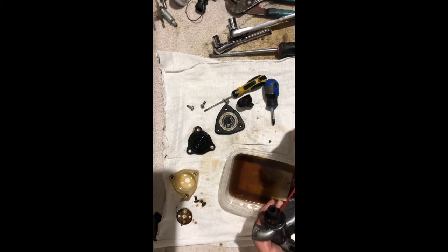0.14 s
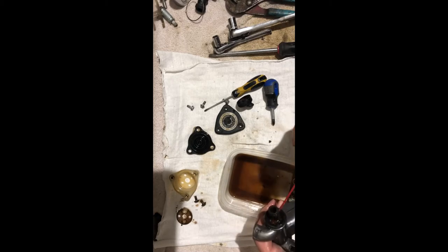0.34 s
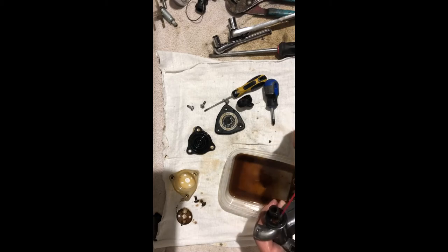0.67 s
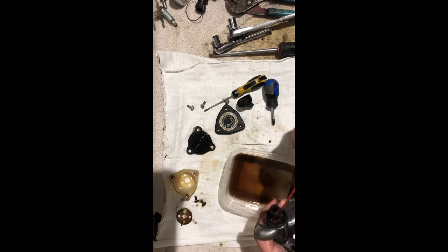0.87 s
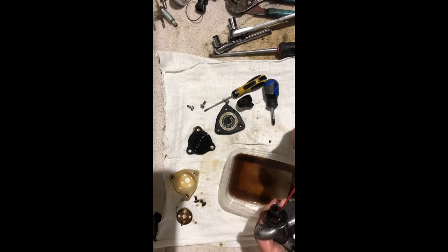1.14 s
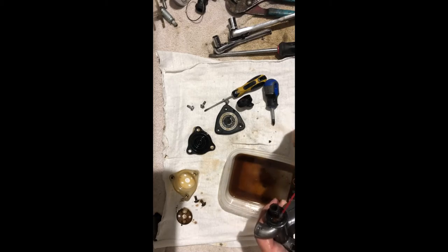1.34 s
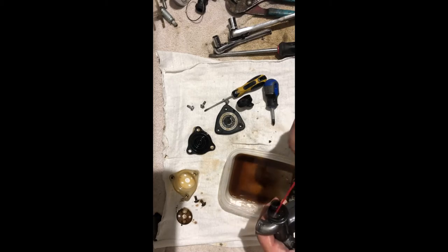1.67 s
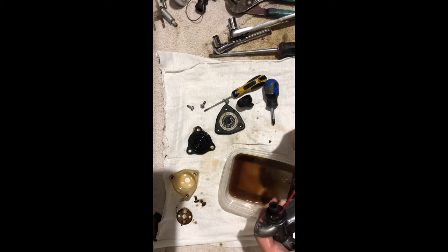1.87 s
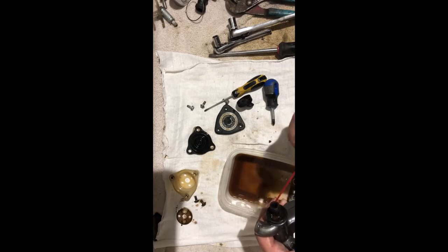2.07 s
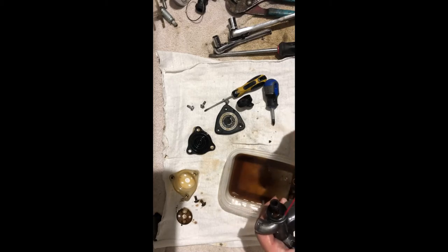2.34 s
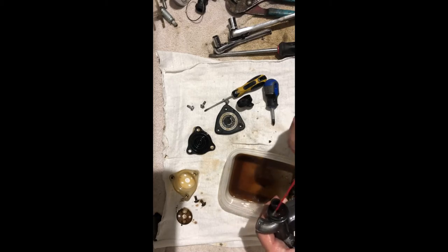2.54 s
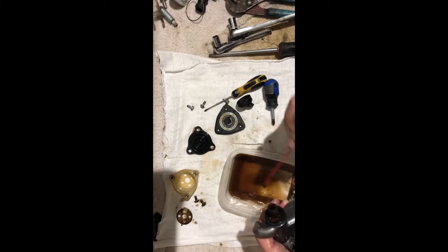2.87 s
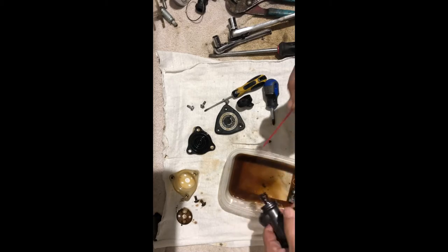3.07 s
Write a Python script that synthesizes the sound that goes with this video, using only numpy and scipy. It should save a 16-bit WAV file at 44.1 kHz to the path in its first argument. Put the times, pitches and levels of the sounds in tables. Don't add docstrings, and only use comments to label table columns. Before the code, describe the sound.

An aerosol can hisses harshly and spits through a straw into a metal part, very close, its tone shifting with aim; it cuts off with a short squeal and faint ticks in a quietly humming garage.

```python
import sys
import numpy as np
from scipy import signal
from scipy.fft import rfft, irfft
from scipy.io import wavfile
from scipy.ndimage import uniform_filter1d

SR = 44100
rng = np.random.default_rng(int(sys.argv[2]) if len(sys.argv) > 2 else 0)


def bounce(signal):
    frames = np.transpose(np.atleast_2d(signal))
    limited = np.clip(frames, -1, 1)
    pcm = np.round(limited * 32767).astype(np.int16)
    wavfile.write(sys.argv[1], SR, pcm)


def linear_from_db(decibels):
    return 10 ** (np.asarray(decibels, float) / 20)


N = 141120
T = np.arange(N) / SR

# time in seconds, flow in dB, aim (0 into the bore, 1 against the wall),
# fizz in dB, tuning of the bore as a factor.
HAND = [(.174, -66.5, .3, 6, 0.98), (.197, -47, 0.026, -9, 0.97), (.31, -40.5, 0.18, -1, 1.01),
        (.73, -43, 0.021, -3.5, 0.99), (.84, -42, 0.059, -1, 1.04), (.91, -40.5, 0.13, 5, 1.008),
        (1.02, -42, 0.12, 1.5, 0.99), (1.2, -39, 0.039, 2.5, 1.0), (1.37, -41, 0.15, 2, 1.01),
        (1.49, -42.5, 0.32, -0.5, 0.96), (1.7, -43.5, 0.86, 6, 1), (1.85, -43, 0.56, 1.5, 0.97),
        (1.95, -41, 0.23, 2.5, 1.062), (2.08, -42, 0.026, -1, 1), (2.17, -42.5, 0.26, -3, 1.05),
        (2.3, -41.5, 0.22, -0.5, 1.01), (2.45, -44.5, 0.72, 2, 0.97), (2.65, -42.5, 0.65, 5, 0.99),
        (2.8, -41.5, 0.09, -3, 1.05)]
# time in seconds, flow in dB, share of bare gas (0-1).
CLOSING = [
    (2.835, -1, 0.037),
    (2.852, -6, 0.85),
    (2.864, -8.5, 1),
    (2.89, -8, 1),
    (2.928, -14, 1),
    (2.945, -27.5, 1),
    (3.025, -34, 0.75),
    (3.045, -29, 1),
    (3.11, -40, 0.87),
]
SPIT_S = 0.00076
ROOM_DB = -12.5


def evened(x):
    return x / np.sqrt(np.mean(x ** 2) + 1e-20)


def read(points, hz):
    f, value = np.transpose(points)
    return np.interp(np.log(hz + 1), np.log(f + 1), value)


def curves(rows, t):
    s, *columns = np.transpose(rows)
    return [np.interp(t, s, column) for column in columns]


def wander(size):
    smooth = uniform_filter1d(rng.standard_normal(N), size)
    return evened(uniform_filter1d(smooth, size))


def resonate(x, hz, width):
    turn = np.exp(2j * np.pi * hz * T)
    r = np.exp(-np.pi * width / SR)
    return 2 * (turn * signal.lfilter([1 - r], [1, -r], x / turn)).real


def narrow_noise(air, hz, width):
    return evened(resonate(resonate(air, hz, width), hz, width))


def bump(hz, centre_hz, width):
    return 1 / (1 + (2 * (hz - centre_hz) / width) ** 2)


def whistle(modes, swell):
    air = rng.standard_normal(N)
    tones = sum(linear_from_db(db) * narrow_noise(air, hz, width) for hz, width, db in modes)
    return evened(tones) * linear_from_db(curves(swell, T)[0]) * (T > swell[0][0])


def room(x):
    t = T[:SR // 2]
    air = rng.standard_normal(len(t))
    low = signal.sosfilt(signal.butter(4, 6640, fs=SR, output="sos"), air)
    low_t60, top_t60 = 0.25, 0.16
    tail = low * linear_from_db(-60 * t / low_t60) + (air - low) * linear_from_db(-60 * t / top_t60)
    tail = tail * (t > .004)
    return signal.fftconvolve(x, tail / np.linalg.norm(tail))[:N]


def garage():
    # frequency in Hz, level in dB per Hz.
    air_colour = [(26, -41), (45, -6), (67, -1), (108, -22), (177, -6), (326, -18.5), (615, -18),
                  (1350, -25.5), (15500, -39.5)]
    # frequency in Hz, width in Hz, level in dB.
    machinery = [(58, 34, -4), (84.7, 14, -3.5), (140, 25, -6)]
    # time in seconds, level in dB.
    hum_swell = [(0.0, -70), (.15, -65), (.4, -63.5), (1.2, -65), (1.8, -68), (2.07, -65), (2.3, -68.5),
                 (2.8, -68), (3.2, -70)]
    air_db, low_cut_hz = -72, 52
    hz = np.fft.rfftfreq(N, 1 / SR)
    gain = linear_from_db(read(air_colour, hz)) / (1 + (low_cut_hz / (hz + 1)) ** 8)
    air = evened(irfft(rfft(rng.standard_normal(N)) * gain, N))
    hum = sum(linear_from_db(db) * evened(resonate(rng.standard_normal(N), f, width)) for f, width, db in machinery)
    return linear_from_db(air_db) * air + hum * linear_from_db(curves(hum_swell, T)[0])


def drained():
    # frequency in Hz, width in Hz, level in dB.
    ring = [(3030, 70, -3), (5050, 90, 0), (5430, 110, -3), (4860, 60, -6)]
    # time in seconds, level in dB.
    ring_swell = [(2.83, -80), (2.87, -60), (2.888, -58), (2.9, -53), (2.915, -60), (2.94, -64),
                  (2.97, -68), (2.985, -75), (3.01, -73), (3.06, -88)]
    return whistle(ring, ring_swell)


def straw():
    # frequency in Hz, width in Hz, level in dB.
    column = [(3020, 120, 0), (4500, 120, 0), (5850, 150, -3), (7000, 150, -3)]
    # time in seconds, level in dB.
    column_swell = [(2.7, -88), (2.8, -50), (2.835, -52), (2.855, -44), (2.875, -52), (2.94, -72.5),
                    (3.0, -81), (3.06, -91)]
    return whistle(column, column_swell)


def valve():
    # time in seconds, fundamental in Hz, level in dB,
    # level of the odd partials in dB, lost when the seat beats twice as fast.
    squeal = [
        (2.84, 890, -54, 0),
        (2.856, 905, -41, 0),
        (2.865, 985, -41, 0),
        (2.874, 1005, -39, 0),
        (2.883, 1018, -45, 0),
        (2.887, 985, -44, -25),
        (2.892, 915, -44, -30),
        (2.897, 825, -43, -30),
        (2.902, 745, -49, -30),
        (2.908, 680, -66, -30),
    ]
    # frequency in Hz, level in dB.
    squeal_tone = [(1650, -30), (2000, -14), (2680, -24), (3000, 1), (3300, -9), (3900, -14), (4800, -3),
                   (6100, -13), (8000, -28)]
    hz, db, odd_db = curves(squeal, T)
    turns = np.cumsum(hz * (1 + 0.0068 * wander(size=60))) / SR
    tone = 0
    for k in range(2, 10):
        partial_db = read(squeal_tone, k * hz) + k % 2 * odd_db
        tone = tone + linear_from_db(partial_db) * np.sin(2 * np.pi * k * turns)
    sounding = (T > squeal[0][0]) * (T < squeal[-1][0])
    return tone * linear_from_db(db + 1.5 * wander(size=80)) * sounding


def ticks():
    # time in seconds, level in dB, frequency in Hz, length in seconds, width as a share of frequency.
    puffs = [
        (.174, -63, 5200, .001, .8),
        (.1805, -63, 3200, .0015, .7),
        (2.984, -74, 13000, .003, .06),
        (3.045, -80, 8700, .012, .05),
        (3.055, -78, 14500, .028, .2),
        (3.18, -78, 4100, .03, .09),
    ]
    air = rng.standard_normal(N)
    out = np.zeros(N)
    for s, db, hz, length, share in puffs:
        out += narrow_noise(air, hz, share * hz) * linear_from_db(db) * np.exp(-((T - s) / length) ** 2)
    return out


def blobs():
    # time in seconds, level in dB.
    large_drops = [(0.2354, -30.5), (0.2575, -29), (0.9213, -24.5), (0.9661, -26), (1.2354, -27),
                   (1.2736, -31), (1.8882, -33), (2.0122, -32), (2.2452, -27), (2.7283, -36), (2.772, -27),
                   (2.8225, -40)]
    out = np.zeros(N)
    for s, db in large_drops:
        out += linear_from_db(db - 11.5) * np.exp(-np.maximum(T - s, 0) / SPIT_S) * (T > s - .0005)
    return out


def jet():
    flutter_db, surge_db = 0.5, 0.22
    spits_per_s, spit_spread_db, spit_db = 500, 2, -7.5
    unsteady_db = flutter_db * wander(size=24) + surge_db * wander(size=1200)
    hiss = rng.standard_normal(N) * linear_from_db(unsteady_db)
    sizes_db = spit_spread_db * np.minimum(rng.exponential(1, N), 2.5)
    drops = (rng.random(N) < spits_per_s / SR) * linear_from_db(sizes_db)
    bursts = signal.lfilter([1], [1, -np.exp(-1 / (SPIT_S * SR))], drops)
    spits = bursts * rng.standard_normal(N)
    return evened(hiss) + linear_from_db(spit_db) * evened(spits)


def colouring(hz, t):
    # frequency in Hz, level in dB per Hz.
    bore = [(150, -33), (250, -16), (669, -20), (867, -16), (1730, -12), (2800, -10.5), (6540, 0),
            (9390, -12.5), (15500, -18.5)]
    # frequency in Hz, level in dB per Hz.
    wall = [(150, -52), (250, -11), (553, -17.5), (1760, -12), (2620, -5.5), (4320, -4), (6000, -4.5),
            (7130, -12), (15500, -26)]
    # frequency in Hz, level in dB per Hz.
    bare_gas = [(300, -16.5), (2300, -12.5), (3000, -2), (4300, -1), (5200, 2.5), (7700, -10), (8800, -7),
                (10400, -24), (14500, -11)]
    # frequency in Hz, width in Hz, dB at the bore, dB at the wall.
    part = [(834, 146, 8, 11), (1110, 66, 2, 5.5), (1762, 35, 11, 10.5), (2420, 570, 3, -4.5),
            (6300, 170, 4.5, -5), (6870, 160, 5, 0), (7380, 570, 3, 8.5), (8070, 190, 5.5, -5.5),
            (8850, 390, 6, -6), (10120, 310, 6.5, -2), (11800, 180, 5, -1.5), (13800, 720, 5, -2.5),
            (15200, 540, 8.5, 4)]
    # frequency in Hz, width in Hz, dB at the bore, dB at the wall.
    bench = [(650, 150, -8, -8), (1300, 110, -7, -6), (1610, 60, -5, -4), (2800, 180, -9, -9),
             (5880, 250, -3, -12), (6250, 500, 0, -7), (7750, 250, -1, -9), (8310, 120, -8, -5),
             (9500, 200, -5, -3), (10400, 400, -4, -6), (11300, 120, -6, 0), (12050, 200, -3, -4),
             (14400, 300, -3, 0)]
    # frequency in Hz, width in Hz, dB at the bore, dB at the wall.
    cavity = [(3246, 580, 6, 7.5), (3920, 305, -8, -3.5), (4288, 265, 11, 6.5), (4710, 136, -11, -10),
              (5210, 140, 6, 5), (5550, 110, 4, 8.5)]
    # time in seconds, mist frequency in Hz, mist level in dB, rim level in dB.
    mist = [(.18, 14300, 6, 0), (.3, 13800, 5, 1), (.45, 14000, 2, 1), (.65, 15100, 6, 0),
            (.8, 13200, 2, -2), (.9, 13900, 5, 1), (1.02, 13500, 1, -2), (1.2, 13700, 4, 1),
            (1.33, 13500, 3, 0), (1.4, 13700, 5, 5), (1.47, 13400, 6, 1), (1.57, 13700, 11, 3),
            (1.7, 13900, 10, 5), (1.8, 13600, 10, 3), (1.93, 13800, 9, 4), (2.02, 12800, 2, 0),
            (2.06, 14900, 1, 1), (2.15, 14700, 8, 4), (2.25, 14300, 8, 6), (2.33, 13500, 8, 4),
            (2.39, 12200, 5, 8), (2.45, 11300, 3, 12), (2.49, 13600, 6, 8), (2.57, 13700, 10, 4),
            (2.62, 14200, 11, 6), (2.7, 14000, 10, 2), (2.77, 13500, 4, 3), (2.84, 14000, 0, 6)]
    # time in seconds, length in seconds, frequency
    # in Hz, width in Hz, change in dB.
    band_changes = [(.62, .15, 12000, 1500, -1), (0.92, .04, 13000, 700, -2), (1.5, .07, 11700, 890, -8),
                    (1.5, 0.17, 9800, 1000, -5), (1.65, 0.15, 7900, 1100, -3), (1.68, .13, 6200, 300, -5),
                    (2.0, .06, 13000, 970, -3), (2.16, .07, 11300, 1500, -3), (1.4, 0.063, 8400, 710, -11),
                    (2.2, .1, 4270, 220, -2), (2.2, 0.27, 8650, 1000, 4.5), (2.55, 0.13, 8300, 1200, -5),
                    (2.52, .1, 5600, 290, -6.5), (1.9, .06, 8800, 1000, -6), (2.875, 0.027, 1200, 800, -6),
                    (1.46, 0.13, 10700, 550, 6), (1.8, .07, 16000, 600, 8)]
    fizz_hz, fizz_octaves = 10300, 0.78
    ripple_db, patch_db, top_patch_db = 1.4, .8, 1.5

    _, aim, fizz_db, tuning = curves(HAND, t)
    gas = curves(CLOSING, t)[1]
    f = hz[:, None]

    ripple = evened(uniform_filter1d(rng.standard_normal((2, len(hz))), size=2))
    into_bore, on_wall = np.array([read(bore, hz), read(wall, hz)]) + ripple_db * ripple
    field = np.outer(into_bore, 1 - aim) + np.outer(on_wall, aim)
    field += fizz_db * np.exp(-(np.log2((f + 1) / fizz_hz) / fizz_octaves) ** 2)

    for rows, scale in (([*part, *bench], 1), (cavity, tuning)):
        for centre, width, bore_db, wall_db in rows:
            field += (bore_db + (wall_db - bore_db) * aim) * bump(f, centre * scale, width)

    mist_hz, mist_db, rim_db = curves(mist, t)
    field += mist_db * bump(f, mist_hz, 1460) + rim_db * bump(f, 15200, 1100)
    field = (1 - gas) * field + gas * read(bare_gas, f)

    for s, length, centre, width, db in band_changes:
        field += db * bump(f, centre, width) * np.exp(-((t - s) / length) ** 2)

    patches = rng.standard_normal((len(t), len(hz))).T
    patches = uniform_filter1d(patches, size=14, axis=0)
    patches = evened(uniform_filter1d(patches, size=40, axis=1))
    return field + np.where(f > fizz_hz, top_patch_db, patch_db) * patches


def spray():
    flow_db = curves(HAND, T)[0] + curves(CLOSING, T)[0]
    source = jet() * (linear_from_db(flow_db) + blobs()) * (T > HAND[0][0])
    hz, t, z = signal.stft(source + linear_from_db(ROOM_DB) * room(source), SR, nperseg=1024, noverlap=896)
    gain = linear_from_db(colouring(hz, t))
    gain = gain / np.sqrt((gain ** 2).mean(axis=0))
    return signal.istft(z * gain, SR, nperseg=1024, noverlap=896)[1][:N]


def scene():
    can = straw() + valve() + ticks()
    mix = garage() + drained() + can + linear_from_db(ROOM_DB) * room(can) + spray()
    return np.tile(mix, (2, 1))


def roll_off(x):
    return signal.sosfilt(signal.butter(12, 15900, fs=SR, output="sos"), x)


def record(dry):
    edge = signal.firwin(2047, 15730, window=("kaiser", 9), fs=SR)
    return roll_off(signal.oaconvolve(dry, edge[None], "same"))


dry = scene()
out = record(dry)
bounce(out)
```